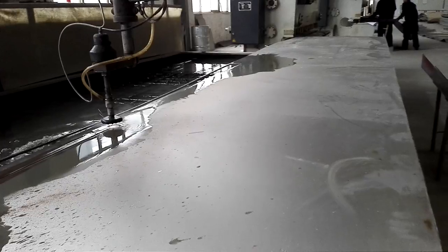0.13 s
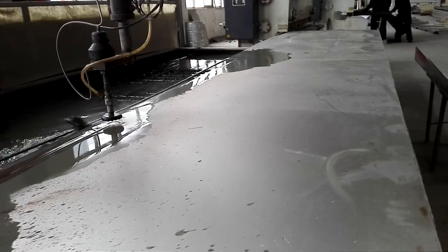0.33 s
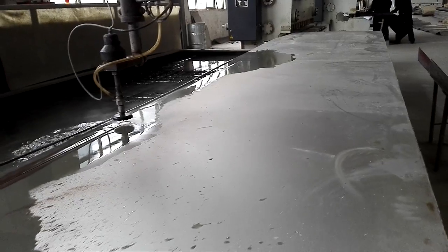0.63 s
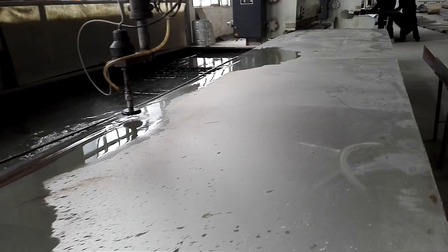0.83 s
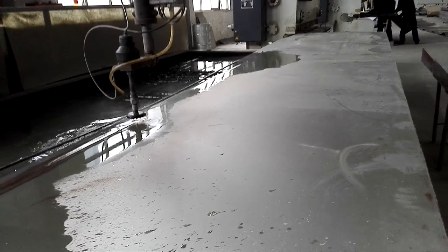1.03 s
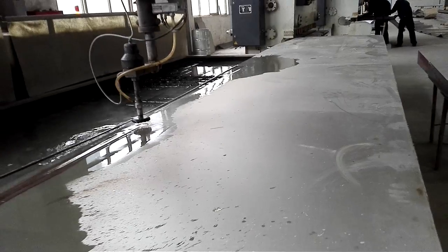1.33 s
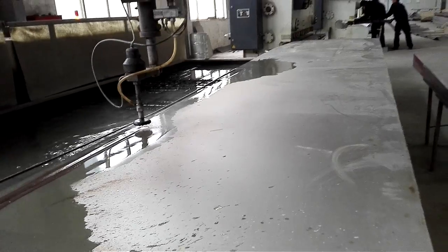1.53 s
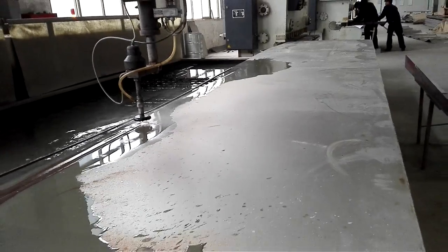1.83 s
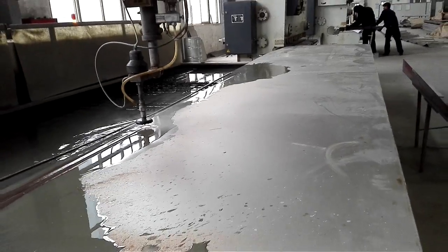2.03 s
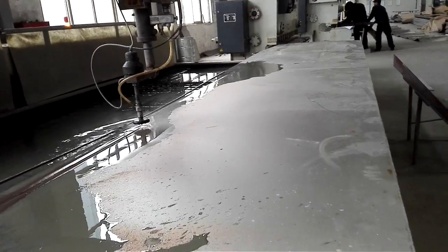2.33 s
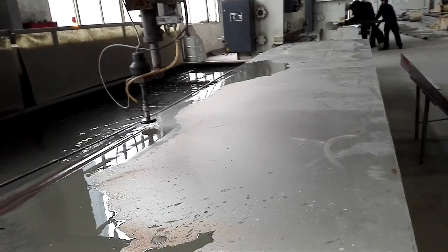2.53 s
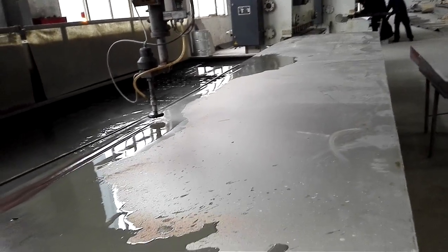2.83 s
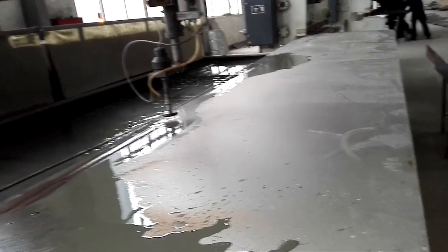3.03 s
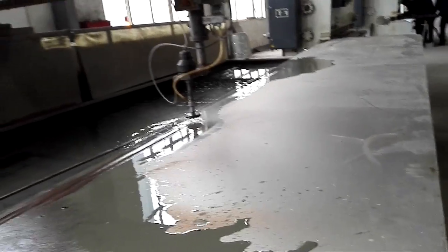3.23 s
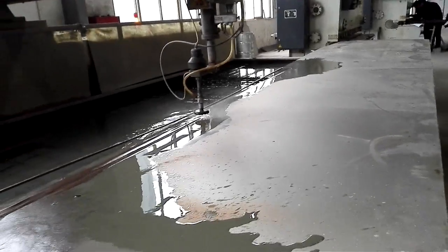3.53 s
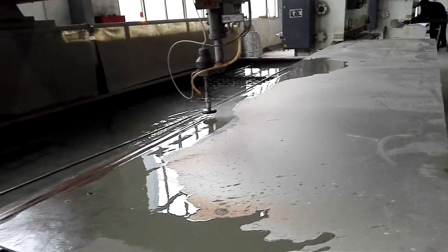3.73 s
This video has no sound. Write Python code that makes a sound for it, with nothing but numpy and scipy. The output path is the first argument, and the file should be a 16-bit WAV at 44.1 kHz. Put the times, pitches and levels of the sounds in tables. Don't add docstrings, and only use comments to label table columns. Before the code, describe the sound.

A waterjet cuts a wet metal plate continuously for about four seconds, close and loud. Its harsh, wide hiss flickers with fine spray and a narrow ring, strongest near 2.1, 2.6 and 3.7. Water roars and churns below, fuller around 0.5-1.1 and surging from 3.7. Low air gulps bubble near 0.4, 1.6 and 2.9. Pump hum and machine rumble sit faintly behind; the camera microphone overloads.

```python
import sys
import numpy as np
from scipy import signal
from scipy.fft import rfft, irfft, next_fast_len
from scipy.io import wavfile
from scipy.ndimage import uniform_filter1d, map_coordinates

SR = 44100
rng = np.random.default_rng(int(sys.argv[2]) if len(sys.argv) > 2 else 0)


def waveform_to_disk(signal):
    frames = np.transpose(np.atleast_2d(signal))
    scaled = np.clip(frames, -1, 1) * 32767
    samples = np.round(scaled).astype(np.int16)
    wavfile.write(sys.argv[1], SR, samples)


def ratio_of_db(decibels):
    return 10 ** (np.asarray(decibels, float) / 20)


N = 171108

# start_s, hiss_db, spray_db, kerf_ring_db
JET_MOVES = [(0, -11.5, -9.5, -13), (.1, -15, -8, -12), (.26, -10, -9, -11.5), (.43, -15.5, -10.5, -7),
             (.5, -12.5, -13, -5.5), (.8, -11, -10, -6.5), (1.29, -12.5, -8.5, -12.5),
             (1.47, -14.5, -10.5, -7.5), (1.9, -10.5, -9.5, -6), (2.12, -16, -13, -2),
             (2.4, -9, -10.5, -12), (2.53, -10.5, -6, -8), (2.62, -10.5, -11, -3), (2.9, -12, -9, -3.5),
             (2.96, -9, -12, -9.5), (3.4, -10, -8.5, -8), (3.62, -12.5, -8.5, -12.5),
             (3.72, -10.5, -13.5, -1.5)]
# start_s, roar_db, deep_churn_db
TANK_MOVES = [(0, -23, -6), (.44, -22, -5.5), (.48, -16, -8), (.7, -15.5, -8.5), (.8, -16, -9.5),
              (.95, -16.5, -10.5), (1.13, -16.5, -10), (1.19, -20.5, -8.5), (1.34, -22, -5),
              (1.47, -17.5, -5), (1.75, -18.5, -7), (1.89, -20, -3), (2.2, -19.5, -5), (2.77, -21, -7),
              (2.83, -22.5, -7), (3.65, -21.5, -7), (3.7, -13.5, -3.5), (3.88, -11.5, -5.5)]
# center_s, length_s, level_db
AIR_GULPS = [
    (0.126, 0.099, -24),
    (0.398, 0.029, -21),
    (.97, .06, -29),
    (1.12, .04, -31),
    (1.61, 0.035, -20),
    (2.017, 0.07, -29),
    (2.211, 0.054, -30),
    (2.64, .05, -29),
    (2.9, 0.08, -19.5),
    (3.275, 0.044, -30),
]
# freq_hz, density_db_per_hz
HISS_COLOR = [(700, -9), (1500, -9.5), (2200, -2.5), (3500, 1), (5000, -3), (6200, -4.5), (8000, -25),
              (11000, -25)]
# freq_hz, density_db_per_hz
KERF_COLOR = [(2200, -8), (2550, -6.5), (2800, -3.5), (3050, -7.5), (3500, -26.5)]
# freq_hz, density_db_per_hz
SPRAY_COLOR = [(3500, -42), (5500, -8.5), (7000, 2), (9000, -3.5), (12000, -9), (13800, -12.5),
               (16000, -18)]
# freq_hz, density_db_per_hz
ROAR_COLOR = [(350, -25), (600, -8), (850, -3.5), (1050, -3), (1250, 0), (1600, -1.5), (2200, -7),
              (3500, -22)]
# freq_hz, density_db_per_hz
CHURN_COLOR = [(60, -30), (100, -16), (140, -5), (200, -4), (320, 0), (500, -2), (750, -9), (1200, -30)]
# freq_hz, density_db_per_hz
GULP_COLOR = [(90, -1), (170, 13), (300, 12), (450, 3), (800, -77)]
# pitch_hz, level_db, pitch_wander_hz
PUMP_TONES = [(173.9, -38, 5), (307.7, -38, 7.9), (1016, -32.5, 4.92)]
# freq_hz, density_db_per_hz
HALL_COLOR = [(15, -8), (45, -4), (60, -6), (85, 0), (140, 0), (220, -3), (400, -20)]
# freq_hz, left_right_likeness_0_to_1, left_lead_rad
LOW_IMAGE = [(60, .96, 0), (200, .95, 0), (320, .82, 0), (450, .4, .5), (570, .3, 2.3), (720, .15, 1),
             (1200, .6, .45), (1700, .1, 0)]
# freq_hz, left_right_likeness_0_to_1, left_lead_rad
HIGH_IMAGE = [(1700, 0.033, 0.5), (2260, 0.093, -2), (2990, 0.073, 0.6), (4100, 0.18, 3), (5170, 0.093, 5),
              (5650, 0.027, 6.5), (14000, 0.026, 7.5)]
# center_hz, width_hz, boost_ratio
LEFT_PORT = [(4970, 530, 1.27), (5250, 400, 0.96), (8600, 4500, 0.44)]
# center_hz, width_hz, boost_ratio
RIGHT_PORT = [(2830, 850, 0.48), (4290, 1100, 1.36), (2090, 350, 0.22)]


def unit(x):
    return x / np.sqrt(np.mean(x ** 2) + 1e-20)


def along(points, hz, order=1):
    columns = np.transpose(points)
    return np.interp(np.log(hz + 1), np.log(columns[0] + 1), columns[order])


def curves(rows):
    start_s, *columns = np.transpose(rows)
    t = np.arange(N) / SR
    return [np.interp(t, start_s, column) for column in columns]


def wobble(rate):
    knots = rng.standard_normal(400)
    return map_coordinates(knots, [np.arange(N) * rate / SR])


def filtered(x, response):
    size = next_fast_len(N + 8192)
    hz = np.fft.rfftfreq(size, 1 / SR)
    return irfft(rfft(x, size) * response(hz), size)[..., :N]


def image(hz, order):
    split_hz = 1700
    return np.where(hz < split_hz, along(LOW_IMAGE, hz, order), along(HIGH_IMAGE, hz, order))


def rush(color, patchy_db, bins, frames):
    grains = signal.stft(rng.standard_normal((2, N)), nperseg=512)[2]
    patches = rng.standard_normal(grains.shape[1:])
    patches = uniform_filter1d(uniform_filter1d(patches, bins, 0), frames, 1)
    noise = signal.istft(grains * ratio_of_db(patchy_db * unit(patches)), nperseg=512)[1][:, :N]

    def mid_side(hz):
        angle = np.arccos(np.clip(image(hz, order=1), -1, 1)) / 2
        gain = (hz > color[0][0]) * ratio_of_db(along(color, hz))
        return gain * np.array([np.cos(angle), np.sin(angle)])

    def lead(hz):
        return np.exp(0.5j * np.outer([1, -1], image(hz, order=2)))

    mid, side = filtered(noise, mid_side)
    return unit(filtered(np.array([mid + side, mid - side]), lead))


def jet():
    level_db, spray_db, kerf_db = curves(JET_MOVES)
    flutter_db = 0.51 * wobble(12) + 0.53 * wobble(20)
    hiss = ratio_of_db(flutter_db) * rush(HISS_COLOR, patchy_db=2.49, bins=6, frames=7)

    pan_db = np.array([[-1.5], [1.5]])
    kerf_gain = ratio_of_db(kerf_db + 1.8 * wobble(21) + pan_db)
    kerf = kerf_gain * rush(KERF_COLOR, patchy_db=2.0, bins=2, frames=10)

    spray_gain = ratio_of_db(spray_db + 2.5 + 0.27 * flutter_db + 0.7 * wobble(14))
    spray = spray_gain * rush(SPRAY_COLOR, patchy_db=2.22, bins=14, frames=8)
    return ratio_of_db(level_db - 1.5) * (hiss + kerf + spray)


def tank():
    level_db, deep_db = curves(TANK_MOVES)
    surge_db = 0.62 * wobble(11)
    roar = ratio_of_db(surge_db + 4.5) * rush(ROAR_COLOR, patchy_db=1.6, bins=3, frames=7)
    churn_gain = ratio_of_db(deep_db + 3.15 + 0.7 * surge_db + 1.73 * wobble(16))
    churn = churn_gain * rush(CHURN_COLOR, patchy_db=1.9, bins=2, frames=5)
    return ratio_of_db(level_db) * (roar + churn)


def pump():
    hum = np.zeros(N)
    for pitch_hz, level_db, wander_hz in PUMP_TONES:
        gain = np.sqrt(2) * ratio_of_db(level_db + 1.23 * wobble(5.25))
        turns = np.cumsum(pitch_hz + wander_hz * wobble(8)) / SR
        hum += gain * np.sin(2 * np.pi * turns)
    return hum


def hall():
    return ratio_of_db(-35) * rush(HALL_COLOR, patchy_db=0.5, bins=3, frames=10)


def gulps():
    t = np.arange(N) / SR
    swell = np.zeros(N)
    for center_s, length_s, level_db in AIR_GULPS:
        swell += ratio_of_db(level_db) * np.exp(-8 * ((t - center_s) / length_s) ** 2)
    return swell * rush(GULP_COLOR, patchy_db=3.0, bins=3, frames=4)


def scene():
    return jet() + tank() + pump() + hall() + gulps()


def port(peaks, hz):
    response = 1
    for center_hz, width_hz, boost in peaks:
        damping = 1j * hz * width_hz
        response = response + boost * damping / (center_hz ** 2 - hz ** 2 + damping)
    return response


def overload(x):
    ceiling, knee = 0.88, 6.2
    return x / (1 + abs(x / ceiling) ** knee) ** (1 / knee)


def top_cut(x):
    return signal.sosfilt(signal.butter(12, 14270, fs=SR, output="sos"), x)


def record(dry):
    x = filtered(dry, lambda hz: np.array([port(LEFT_PORT, hz), port(RIGHT_PORT, hz)]))
    x = overload(x)
    x = x - filtered(x - x.mean(0), lambda hz: 0.8 / (1 + (hz / 200) ** 4))
    x = filtered(x, lambda hz: 1 / (1 + (hz / 14550) ** 24))
    return top_cut(x)


dry = scene()
out = record(dry)
waveform_to_disk(out)
```